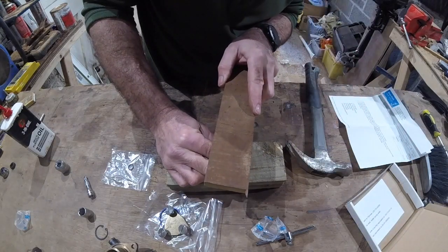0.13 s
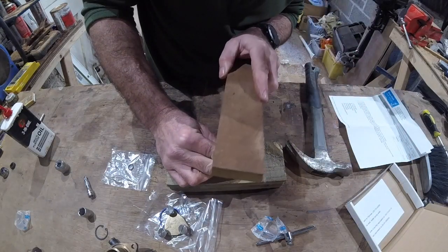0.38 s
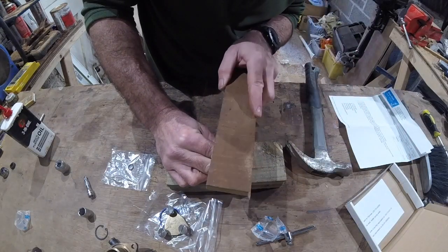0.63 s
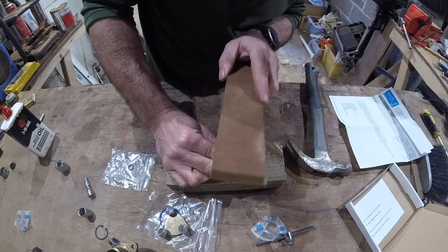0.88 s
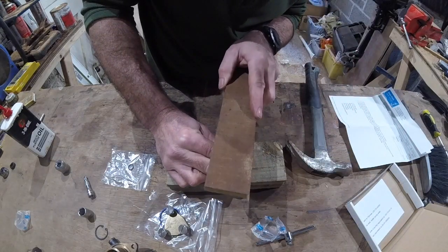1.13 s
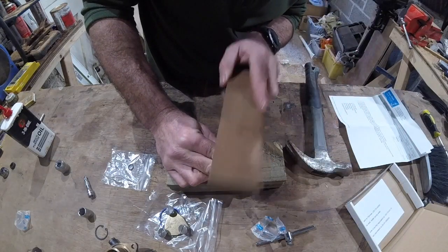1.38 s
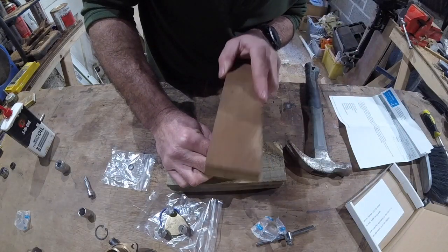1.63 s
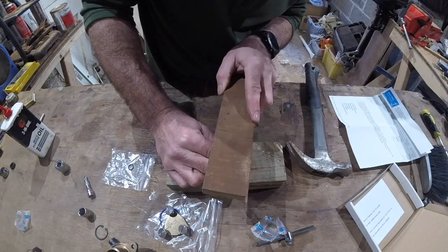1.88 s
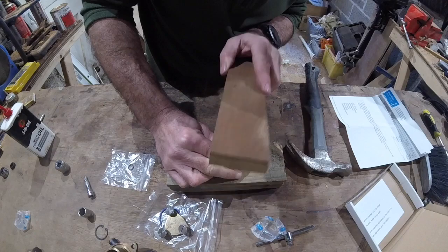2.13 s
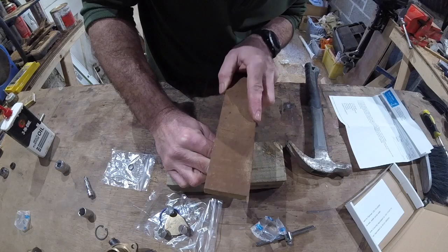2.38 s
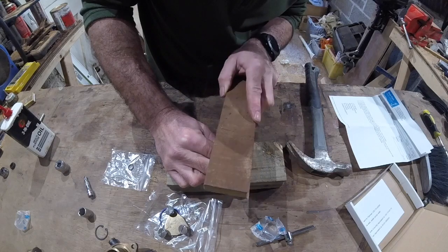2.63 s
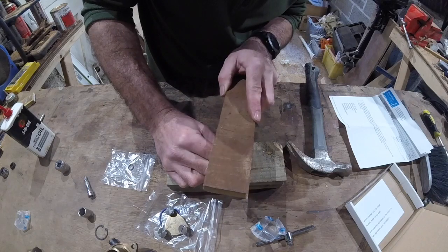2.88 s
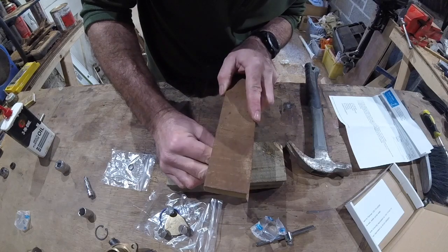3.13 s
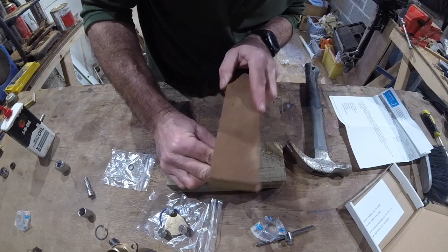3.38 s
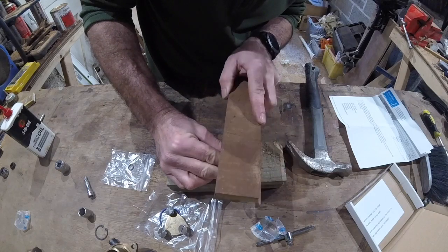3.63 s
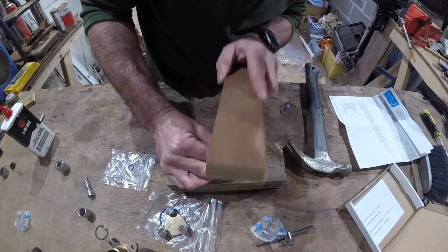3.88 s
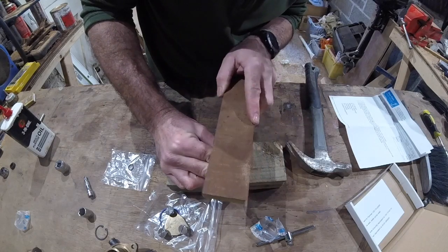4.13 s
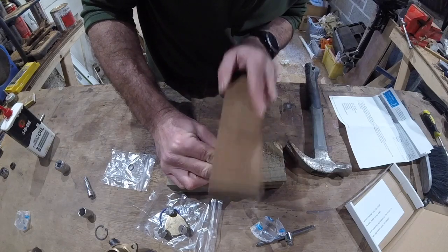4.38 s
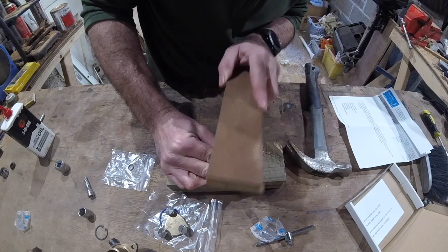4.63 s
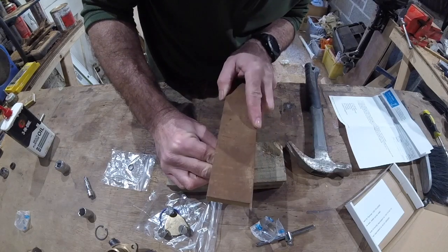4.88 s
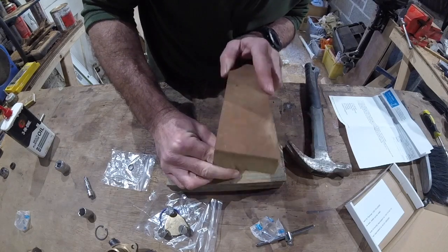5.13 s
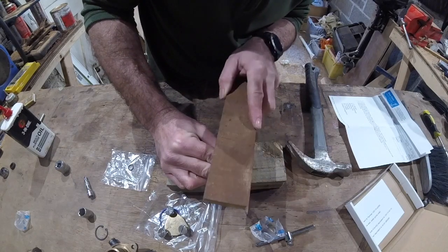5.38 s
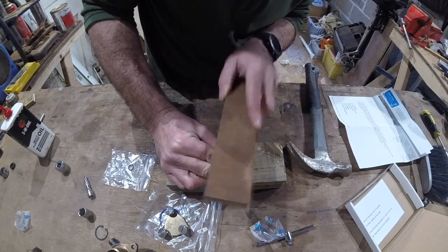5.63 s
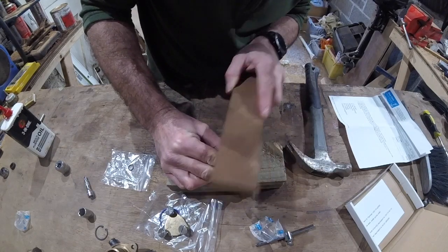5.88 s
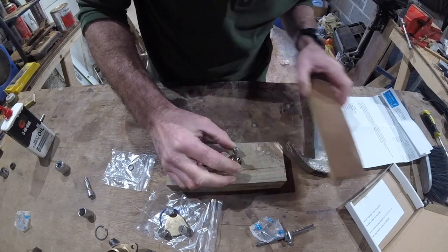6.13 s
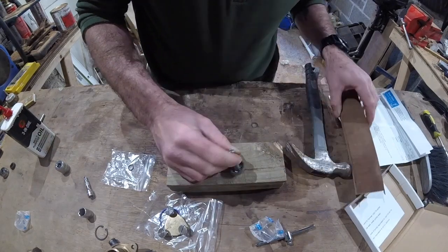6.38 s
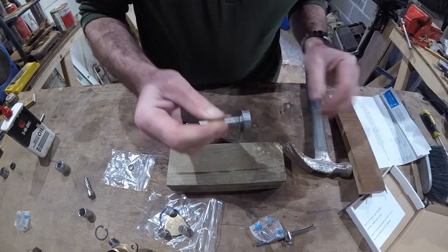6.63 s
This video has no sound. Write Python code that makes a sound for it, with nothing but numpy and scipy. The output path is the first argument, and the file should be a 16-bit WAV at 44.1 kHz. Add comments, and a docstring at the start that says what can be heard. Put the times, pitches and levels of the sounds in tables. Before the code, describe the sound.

A faint hiss and low rumble run throughout, heard through a close, housed microphone with dulled top treble. After a quiet half second, a wooden strip starts striking a steel bearing on a wooden block: blows at about 0.6, 0.97, 1.43, 1.8, 2.3 and 2.64 s, then a pause of nearly a second, then 3.6, 3.96, 4.43, 4.77, 5.26 and 5.67 s. Each is a dry, quickly damped crack with a hollow wooden knock, a brief splintery snap and a low bench boom; the one at 2.3 is strongest, the one at 5.26 duller. Small dull rebounds follow many. A small workshop adds a very short echo, and automatic gain ducks just before loud blows. From 6.13 the strip is laid down: a bump at 6.27, light scraping, then a bright, loose clatter around 6.5 to 6.6 over low bench rumble.

```python
"""A faint hiss and rumble run throughout. Then a strip of wood is knocked, blow after blow, on a bearing that
sits on a wooden block: ringing tones make the crack, the hollow knock and the boom of the workbench, noise
makes the snap, and a small workshop answers with dying noise. Small rebounds follow many of the blows.
At the end the strip is laid down, scrapes over the bench and clatters among the tools. All along, the
recorder's gain control ducks just ahead of loud blows and creeps back."""
import sys
import numpy as np
from scipy import signal
from scipy.fft import rfft, irfft, next_fast_len
from scipy.io import wavfile
from scipy.ndimage import uniform_filter1d

SR = 44100
rng = np.random.default_rng(int(sys.argv[2]) if len(sys.argv) > 2 else 0)


def unload_wav(signal):
    """Save mono or channel-first audio to the path in sys.argv[1] as 16-bit WAV at rate SR, clipped to [-1, 1]."""
    wavfile.write(
        sys.argv[1],
        SR,
        np.round(np.clip(np.atleast_2d(signal).T, -1, 1) * 32767).astype(np.int16),
    )


def volts_from_db(level):
    """Convert decibel levels to linear amplitude ratios."""
    exponent = np.asarray(level, float) / 20
    return 10 ** exponent


N = 297675   # length in samples

# Steady background noise, shape of its spectrum: pitch_hz, relative_level_db
HISS_SPECTRUM = [(12, -38.5), (20, 4), (43, -2.5), (144, -21), (278, -25), (537, -30), (600, -30.5),
                 (1520, -34), (2790, -38.5), (4320, -47), (5840, -41.5), (6250, -36.5), (6520, -27),
                 (6850, -33.5), (10400, -43.5), (12200, -48), (14000, -52)]
HISS_DB = -54   # level of the steady hiss and rumble, added after the microphone housing

# Shoves that rock the bench and leave a low rumble: start_s, level_db
SHOVES = [(5.96, -43.5), (6.16, -54), (6.274, -46), (6.386, -36.5), (6.5, -23), (6.59, -20), (6.68, -58)]
SHOVE_RISE_S, SHOVE_FALL_S = 0.015, 0.063

# Workshop echo: pitch_hz, level_db, t60_s (time to die away by 60 dB)
ROOM_ECHO = [(252, -13, 0.1), (505.5, -15, 0.21), (1000, -11, 0.23), (1400, -14.5, 0.25),
             (2020, -18.5, 0.23), (2600, -17.5, 0.14), (3400, -22, 0.24), (4300, -23, 0.22),
             (5500, -17, 0.19), (8000, -19, 0.13)]
WALL_DELAY_S = 0.0013   # how gradually sound fills the room

# The strip scraping over the bench: start_s, length_s, level_db, rustle_pitch_hz, rustle_width_hz
SCRAPES = [(6.129, 0.26, -69, 2000, 2500), (6.275, 0.062, -61.5, 5100, 900),
           (6.381, 0.011, -47.5, 3940, 4970), (6.4, 0.15, -56, 2600, 2460), (6.52, 0.11, -47.5, 2400, 2510),
           (6.615, .14, -55, 1620, 700)]
SCRAPE_RISE_S, SCRAPE_FALL_S = 0.0059, 0.012

# The strip laid down among the tools: start_s, bench_db, block_db, loose_strip_db
CLATTER = [(6.139, -33.5, -40, -54), (6.274, 3, -2, -16.5), (6.386, -13, -19.5, -17),
           (6.477, -27, -50, -21), (6.497, -8.5, 8.5, 11), (6.5056, 2.5, 7, 27), (6.553, 4.5, -3, -6.5),
           (6.589, 4, 3, -8.5), (6.624, -19, -12, -16)]
# Rebounds of block and strip after a blow: start_s, bench_db, block_db
REBOUNDS = [(0.668, -23, -18), (0.701, -15, -30), (1.094, -17.5, -26), (1.926, -17.5, -39),
            (2.394, -20, -13), (2.434, -12, -18.5), (2.711, -10, -20), (2.916, -30, -39), (3.701, -7, -13),
            (4.077, -18, -27), (4.102, -21.5, -28.5), (4.152, -16, -34), (4.511, -11, -16),
            (4.546, -8.5, -17.5), (4.572, -18.5, -31.5), (4.867, -11, -19.5), (4.908, -16, -27.5),
            (5.383, -11, -20), (5.852, -10.5, -27)]
# Blows; a hard one lands on steel, a soft one on the flat of the wood:
# start_s, force_db, hardness_db, brightness_db, splinter_db
BLOWS = [(0.5973, 9, -6, -0.5, -3.5), (0.9689, 15, -3, 5.5, -3.5), (1.4339, 17, 0, -0.5, 2.5),
         (1.7942, 18, 0, -1, -1.5), (2.2971, 22, 3, 0, 1), (2.6383, 13, 4, 1, 1), (3.6142, 16.5, 2, -1, 1),
         (3.9563, 16, 4.5, 2, 3.5), (4.4304, 17, 4, 1.5, 1), (4.7680, 16.5, 3, 3.5, -0.5),
         (5.263, 18.5, -2, -7, 0.5), (5.673, 19, -2.5, 4.5, 2)]

# Ringing tones of each part: pitch_hz, level_db, t60_s, first_swing (1 up, -1 down)
LOOSE_STRIP_TONES = [(339, -37.5, 0.087, 1), (643, -22.5, 0.077, -1), (820, -30.5, 0.038, 1),
                     (1237, -33, 0.14, 1), (1890, -34, 0.0086, -1), (2150, -18, 0.016, 1),
                     (2727, -21, 0.026, -1), (3060, -21.5, 0.015, 1), (3610, -29, 0.021, -1),
                     (4233, -22, 0.016, 1), (5130, -25.5, 0.035, -1), (5610, -16.5, 0.013, 1),
                     (5570, -23, 0.011, -1), (6520, -48, 0.017, 1), (7290, -53, .015, -1)]
BENCH_TONES = [(32.4, -52.5, 0.86, -1), (58.3, -41.5, 0.28, 1), (97, -27.5, 0.094, -1),
               (128.1, -31.5, 0.31, 1), (141.3, -31, .45, 1), (163.9, -14.5, 0.043, 1),
               (169, -36, 0.25, -1), (179.15, -39.5, 0.26, 1), (207, -21.5, 0.085, -1),
               (237.6, -26, 0.04, 1)]
BLOCK_TONES = [(268.5, -31.5, .06, 1), (379, -17, 0.035, -1), (448, -23.5, 0.04, -1), (523, -36, 0.22, 1),
               (595.6, -18.5, 0.058, 1), (676, -26, 0.085, -1), (710, -4.5, 0.0072, -1),
               (704, -20, 0.069, 1), (740, -20.5, .02, -1), (1004, -24.5, 0.043, 1),
               (1073, -23.5, 0.028, -1), (1225, -31.5, 0.097, 1), (1450, -21, .02, -1)]
LOW_CRACK_TONES = [(1712, -8, .007, -1), (2132, -3.5, 0.0025, 1)]
HIGH_CRACK_TONES = [(3015, -37, 0.07, -1), (3027, -19.5, .016, 1), (3176, -7.5, 0.0067, -1),
                    (3450, -9, 0.0046, 1), (4336, -23.5, 0.005, -1)]
FIZZ_TONES = [(4934, -24.5, .012, 1), (5630, -27.5, 0.012, -1), (6450, -26.5, 0.0078, 1)]

# The push needs time to pass into the block and on to the bench
BENCH_LAG_S, BLOCK_LAG_S = 0.0019, 0.0008
# Knock of the block against the force; dB added per dB of hardness (negative: lost)
BLOCK_DB, BLOCK_PER_HARDNESS = -4.5, -1
SNAP_T60_S, SNAP_NEAR_DB, SNAP_TO_WALLS_DB = 0.015, -29, -25

# Dips and peaks of the microphone housing: pitch_hz, width_hz, gain_db
HOUSING_PEAKS = [(4250, 470, -6), (5400, 360, 4), (6600, 99, 5)]
MICROPHONE_TOP_HZ = 8100

# Gain control
FRAME_S, FRAME_START_S, CEILING_DB = 0.032, 0.025, -7
HOLD_S, CREEP_S = 0.095, 0.96
KEEP_SHARE = 0.63        # part of a cut that is kept
REBOUND_SHARE = 0.073    # part of the way back to the kept cut, per frame


def at_hz(points, hz, column=1):
    """Reads one column of a table between its rows, on a log-frequency axis."""
    table = np.array(points)
    return np.interp(np.log(hz), np.log(table[:, 0]), table[:, column])


def soften(x, hz):
    """A blunt contact loses treble: two one-pole low-passes."""
    r = np.exp(-2 * np.pi * hz / SR)
    return signal.lfilter([(1 - r) ** 2], [1, -2 * r, r * r], x)


def strike(tones, times, level_db, spread_db):
    """Each contact sets every tone ringing, with a strength that may vary from contact to contact."""
    at = np.round(times * SR).astype(int)
    out = np.zeros(N)
    chance = rng.standard_normal((len(at), len(tones)))
    for k, (hz, tone_db, t60, swing) in enumerate(tones):
        clicks = np.full(N, 1e-18)   # not quite zero, to keep the filter fast
        clicks[at] = np.sign(swing) * volts_from_db(level_db + tone_db + spread_db * chance[:, k])
        r = volts_from_db(-60 / (t60 * SR))    # shrinkage per sample
        w = 2 * np.pi * hz / SR
        out += signal.lfilter([0, np.sin(w)], [1, -2 * r * np.cos(w), r * r], clicks)
    return out


def swells(starts, lengths, level_db, rise_s, fall_s):
    """Sum of loudness curves that rise, hold for their length and die away."""
    since = np.arange(N) / SR - np.reshape(starts, (-1, 1))
    rise = 1 - np.exp(-np.maximum(since, 0) / rise_s)
    fall = np.exp(-np.maximum(since - np.reshape(lengths, (-1, 1)), 0) / fall_s)
    return volts_from_db(level_db) @ (rise * fall)


def light_contacts():
    """Rebounds and clatter together: start_s, bench_db, block_db."""
    return np.vstack([REBOUNDS, np.array(CLATTER)[:, :3]])


def fizz_db():
    """The topmost rings and the snap are the louder, the more the edge splinters."""
    _, force_db, _, _, splinter_db = np.transpose(BLOWS)
    return force_db + splinter_db


def hiss():
    """Steady rumble and electronic hiss, lifted at the microphone's resonance: shaped noise."""
    size = next_fast_len(N)
    hz = np.maximum(np.arange(size // 2 + 1) * SR / size, 1)
    spectrum = rfft(rng.standard_normal(size)) * volts_from_db(at_hz(HISS_SPECTRUM, hz))
    noise = irfft(spectrum, size)[:N]
    return volts_from_db(HISS_DB) * noise / noise.std()


def rumble():
    """The rocking bench: lumpy low noise that swells with each shove."""
    band = signal.butter(2, [22, 85], "band", fs=SR, output="sos")
    low = signal.sosfilt(band, rng.standard_normal(N))
    s, level_db = np.transpose(SHOVES)
    return low / low.std() * swells(s, 0 * s, level_db, SHOVE_RISE_S, SHOVE_FALL_S)


def workshop(x):
    """In each third of an octave the room stores the power it is given and returns it as dying noise."""
    echo = 0
    edges = 180 * 2 ** np.arange(0, 6.1, 1 / 3)
    white = rng.standard_normal((2, N))   # neighbouring bands take turns
    fill = np.exp(-1 / (WALL_DELAY_S * SR))
    for k, (low, high) in enumerate(zip(edges, edges[1:])):
        band = signal.butter(2, [low, high], "band", fs=SR, output="sos")
        hz = np.sqrt(low * high)
        r = volts_from_db(-120 / (at_hz(ROOM_ECHO, hz, column=2) * SR))   # power is amplitude squared
        power = signal.sosfilt(band, x) ** 2 + 1e-18
        given = signal.lfilter([1 - fill], [1, -fill], power)
        stored = signal.lfilter([1 - r], [1, -r], given)
        noise = signal.sosfilt(band, white[k % 2])
        echo = echo + volts_from_db(at_hz(ROOM_ECHO, hz)) * np.sqrt(stored) * noise / noise.std()
    return echo


def slide():
    """Dense, slightly uneven grains of friction; each scrape rustles around a pitch of its own."""
    hits = rng.random(N) < 9000 / SR   # about 9000 grains a second
    grains = hits * rng.standard_normal(N) * volts_from_db(2 * rng.exponential(1, N))
    out = 0
    for start, length, level_db, hz, width_hz in SCRAPES:
        r = np.exp(-np.pi * width_hz / SR)
        w = 2 * np.pi * hz / SR
        rustle = signal.lfilter([1, 0, -1], [1, -2 * r * np.cos(w), r * r], grains)
        swell = swells([start], [length], np.array([level_db]), SCRAPE_RISE_S, SCRAPE_FALL_S)
        out = out + rustle / rustle.std() * swell
    return out


def loose_strip():
    """Out of the hand the strip rings longer and brighter."""
    s, _, _, level_db = np.transpose(CLATTER)
    return soften(strike(LOOSE_STRIP_TONES, s, level_db, spread_db=2), 9000)


def bench():
    """The heavy top booms in the same way under every contact."""
    s, level_db = np.vstack([np.array(BLOWS)[:, :2], light_contacts()[:, :2]]).T
    return soften(strike(BENCH_TONES, s + BENCH_LAG_S, level_db, spread_db=0.0), 900)


def block():
    """The hollow knock of block and held strip; light contacts sound duller."""
    s, force_db, hard_db, _, _ = np.transpose(BLOWS)
    knock_db = force_db + BLOCK_DB + BLOCK_PER_HARDNESS * hard_db
    hard = strike(BLOCK_TONES, s + BLOCK_LAG_S, knock_db, spread_db=2.5)
    s, _, level_db = light_contacts().T
    light = strike(BLOCK_TONES, s, level_db, spread_db=3)
    return soften(hard, 4600) + soften(light, 1100)


def snap():
    """Crushed fibres: a few milliseconds of broad noise at every blow and every contact of the clatter."""
    blows, clatter = np.array(BLOWS), np.array(CLATTER)
    kicks = np.full(N, 1e-18)
    kicks[np.round(blows[:, 0] * SR).astype(int)] = volts_from_db(fizz_db())
    kicks[np.round(clatter[:, 0] * SR).astype(int)] = volts_from_db(clatter[:, 3])
    fading = signal.lfilter([1], [1, -volts_from_db(-60 / (SNAP_T60_S * SR))], kicks)
    burst = rng.standard_normal(N) * fading
    no_bass = signal.butter(1, 900, "high", fs=SR, output="sos")
    return soften(signal.sosfilt(no_bass, burst), 4500)


def crack():
    """Wood on steel: short bright rings, quickly damped by the hands."""
    s, force_db, hard_db, bright_db, _ = np.transpose(BLOWS)
    low_db = force_db + hard_db
    low = strike(LOW_CRACK_TONES, s, low_db, spread_db=1)
    high = strike(HIGH_CRACK_TONES, s, low_db + bright_db, spread_db=1)
    fizz = strike(FIZZ_TONES, s, fizz_db(), spread_db=1)
    return soften(low + high + fizz, 7000)


def housing(x):
    """The housed microphone has narrow dips and peaks and loses the highest treble."""
    for hz, width_hz, gain_db in HOUSING_PEAKS:
        w = 2 * np.pi * hz / SR
        lift = volts_from_db(gain_db / 2)   # half above and half below the fraction
        a = np.sin(w) * width_hz / hz / 2
        above = [1 + a * lift, -2 * np.cos(w), 1 - a * lift]
        below = [1 + a / lift, -2 * np.cos(w), 1 - a / lift]
        x = signal.lfilter(above, below, x)
    return signal.sosfilt(signal.butter(3, MICROPHONE_TOP_HZ, fs=SR, output="sos"), x)


def scene():
    """Direct sounds and their echo pass the microphone housing; the hiss is added after it."""
    rings = block() + crack() + loose_strip() + slide()
    fibres = snap()
    echo = workshop(rings + volts_from_db(SNAP_TO_WALLS_DB) * fibres)   # the snap goes mostly towards the walls
    heard = rings + volts_from_db(SNAP_NEAR_DB) * fibres + bench() + rumble() + echo
    return (housing(heard) + hiss())[None]


def gain_control(x):
    """Seeing one frame ahead: peaks are capped, most of the cut is kept, held, and slowly given back."""
    starts = np.round(np.arange(FRAME_START_S, N / SR, FRAME_S) * SR).astype(int)
    peak_db = 20 * np.log10(np.maximum.reduceat(np.abs(x), starts))
    next_peak_db = np.append(peak_db[1:], peak_db[-1])
    allowed_db = CEILING_DB - np.maximum(peak_db, next_peak_db)
    gains_db, gain_db, kept_db, quiet_s = [], 0, 0, 0
    for cap_db in allowed_db:
        quiet_s = 0 if cap_db < kept_db else quiet_s + FRAME_S
        creeping_s = np.clip(quiet_s - HOLD_S, 0, FRAME_S)
        kept_db = min(kept_db * np.exp(-creeping_s / CREEP_S), KEEP_SHARE * cap_db)
        gain_db = min(gain_db + REBOUND_SHARE * (kept_db - gain_db), cap_db)
        gains_db.append(gain_db)
    frame = np.maximum(np.searchsorted(starts, np.arange(N), "right") - 1, 0)
    steps = np.array(gains_db)[frame]
    return x * volts_from_db(uniform_filter1d(steps, size=256, origin=127))   # steps are ramped over 6 ms


def top_cut(x):
    """Nothing passes above the cut-off."""
    return signal.sosfilt(signal.butter(12, 14200, fs=SR, output="sos"), x)


def record(dry):
    """The recorder evens out the loudness with its gain control."""
    mix = gain_control(dry[0])[None]
    return top_cut(mix)


dry = scene()
out = record(dry)
unload_wav(out)
```